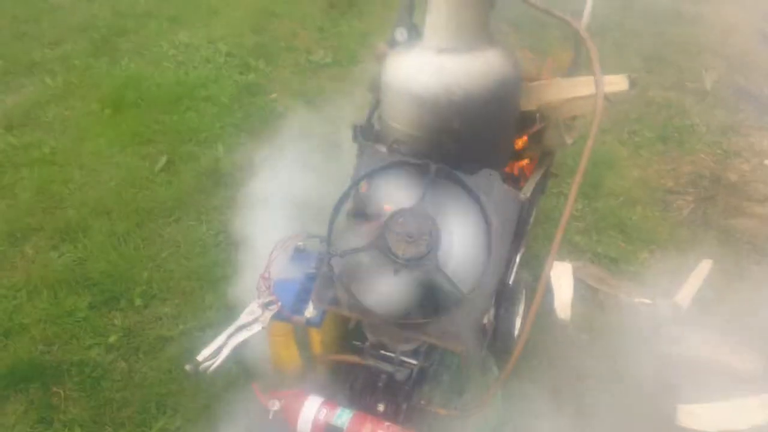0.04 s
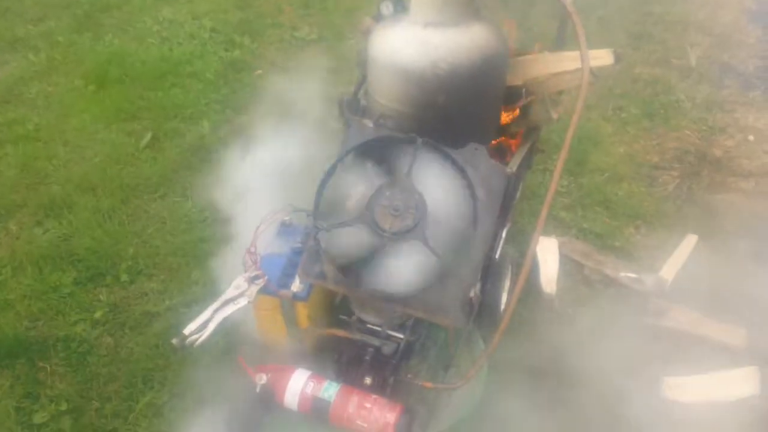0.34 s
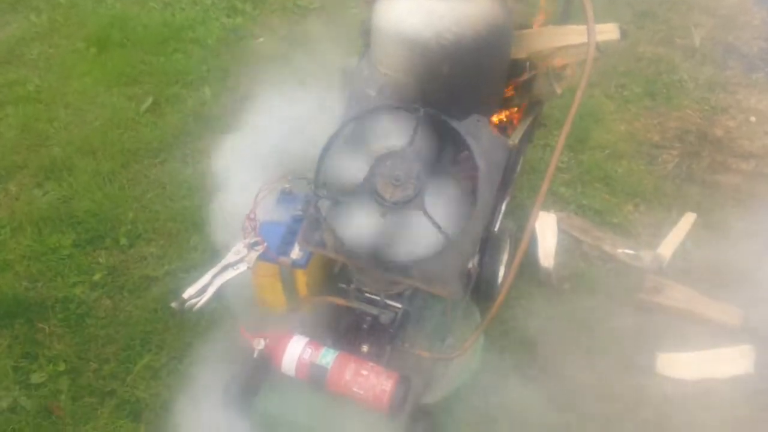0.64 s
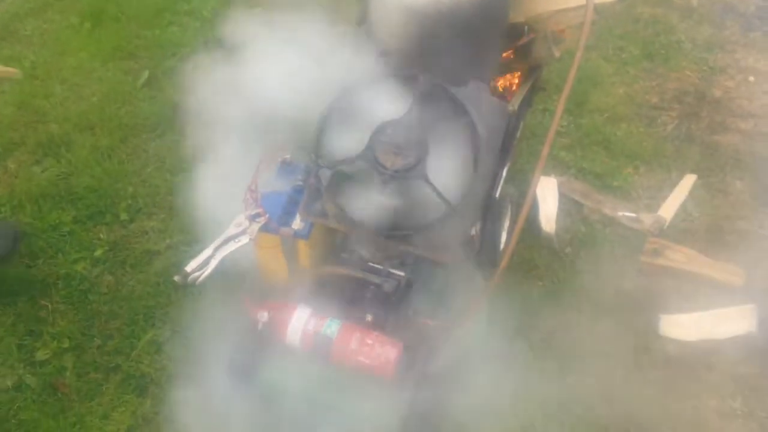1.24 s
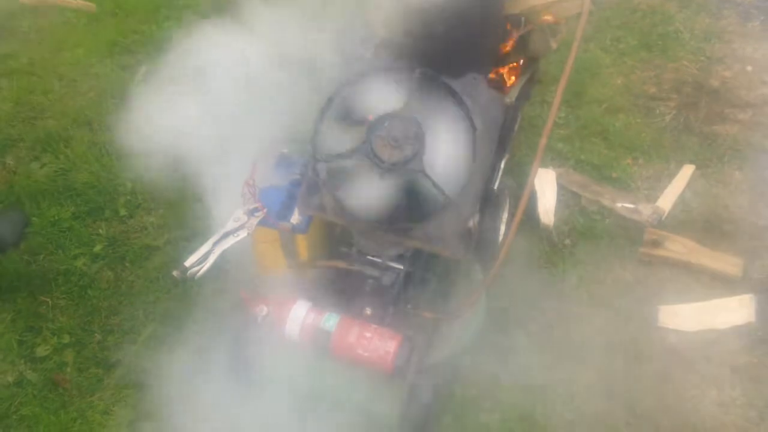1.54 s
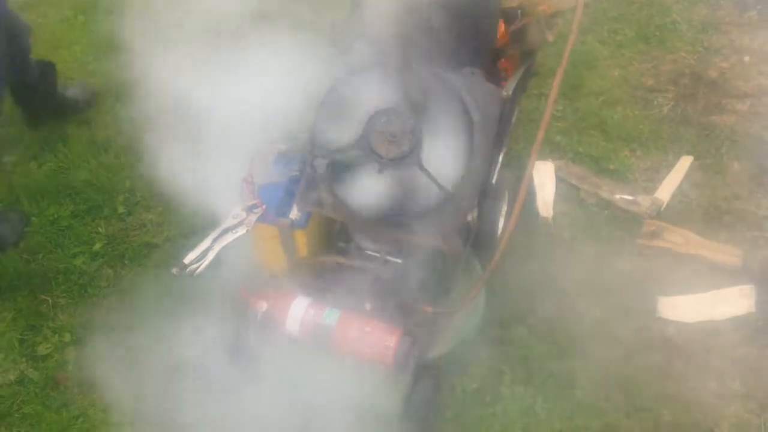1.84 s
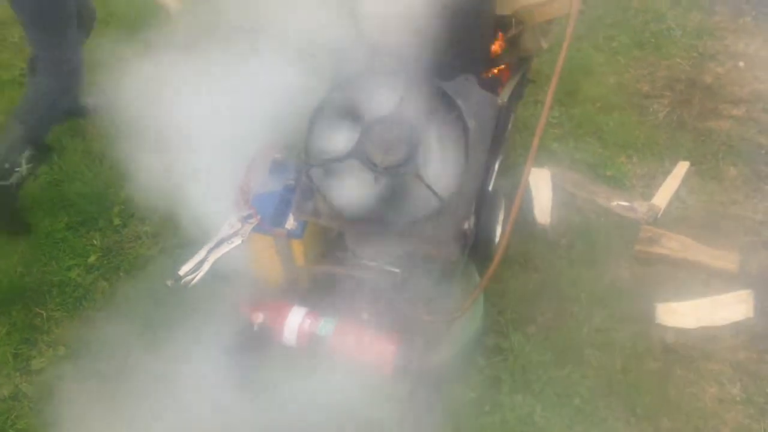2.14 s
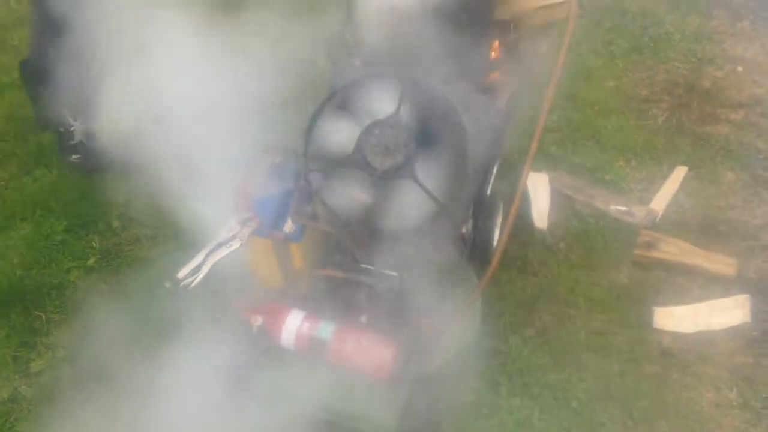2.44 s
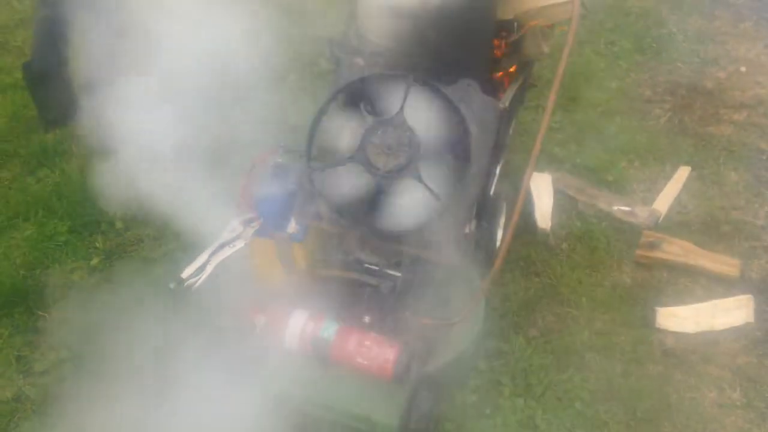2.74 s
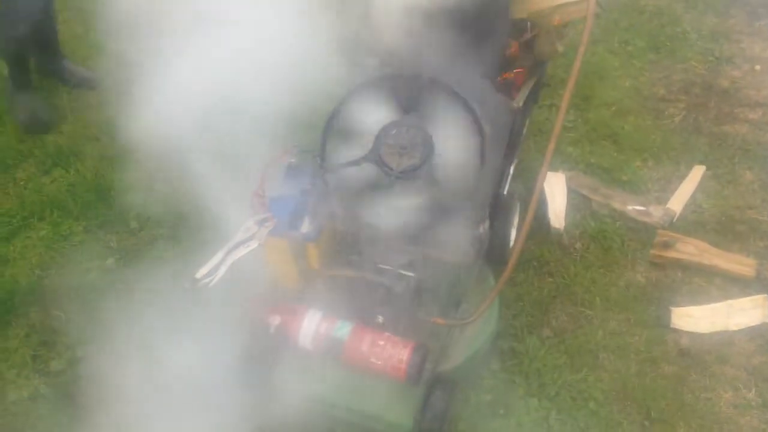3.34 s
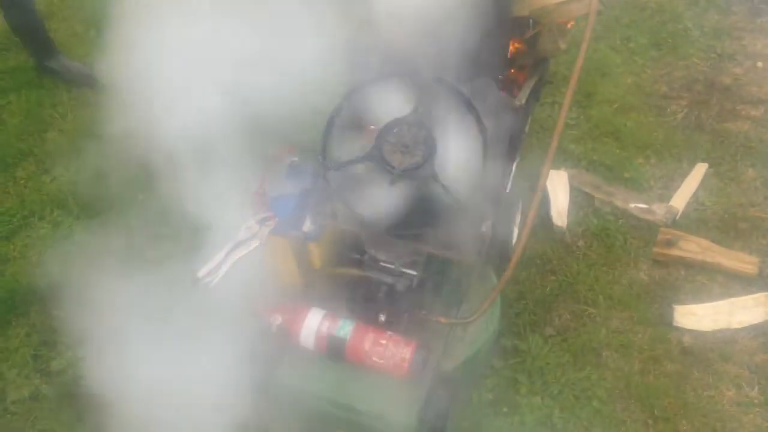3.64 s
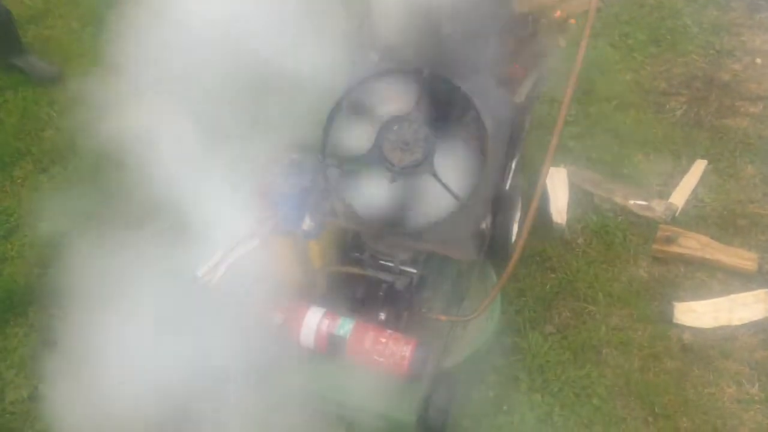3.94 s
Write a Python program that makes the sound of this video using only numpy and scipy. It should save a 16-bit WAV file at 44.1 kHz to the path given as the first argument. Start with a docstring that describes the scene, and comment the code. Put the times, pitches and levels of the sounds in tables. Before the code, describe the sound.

Close up outdoors, a small steam engine runs steadily in rapid thumping bursts of steam, with a sharp metallic knock on every second beat. Light wind brushes the microphone at first, and leaking steam rushes softly underneath.

```python
"""On a lawn, close by, a small homemade steam engine runs at about eleven strokes a second. Each stroke opens
the exhaust: a pressure pulse thumps and a turbulent jet of steam rushes and fades. The frame rings in its
modes, and each stroke ends in an impact, a metal clack with a dull thud, loud and weak on alternate strokes.
Boiler and leaks rush behind; a gust brushes the microphone at first."""
import sys
import numpy as np
from scipy import signal
from scipy.fft import rfft, irfft, next_fast_len
from scipy.io import wavfile
from scipy.ndimage import uniform_filter1d

SR = 44100
rng = np.random.default_rng(int(sys.argv[2]) if len(sys.argv) > 2 else 0)


def wav_record(signal):
    """Record a signal, one row per channel, as 16-bit PCM in the file named by sys.argv[1]."""
    frames = np.transpose(np.atleast_2d(signal))
    bounded = np.clip(frames, -1, 1)
    # unit amplitude maps onto the largest positive 16-bit level
    quanta = np.round(bounded * 32767).astype(np.int16)
    wavfile.write(sys.argv[1], SR, quanta)


N = 176400
IMPACT_SAMPLES = SR // 200  # a 0 dB impact has the energy of 5 ms at rms 1


def amp(db):
    """Amplitude ratio of a level in decibels."""
    return 10 ** (np.asarray(db) / 20)


def shape(points, hz):
    """Gain interpolated between (f/Hz, level/dB) points on a logarithmic frequency axis."""
    f, db = np.transpose(points)
    return amp(np.interp(np.log(hz + 1), np.log(f + 1), db))


def filtered(x, response):
    """Linear filtering: the spectrum is multiplied by a frequency response."""
    size = next_fast_len(N + SR // 2)
    return irfft(rfft(x, size) * response(np.fft.rfftfreq(size, 1 / SR)), size)[:N]


def noise(response):
    """Filtered Gaussian noise of rms 1."""
    x = filtered(rng.standard_normal(N), response)
    return x / np.sqrt(np.mean(x ** 2) + 1e-20)


def add(track, start_s, sound):
    """Superposition: a sound adds to the track from its start time."""
    i = int(round(start_s * SR))
    part = sound[max(-i, 0):max(N - i, 0)]
    track[max(i, 0):][:len(part)] += part


def pulse(points, size=4096):
    """Minimum-phase 0 dB impact with a given spectrum, made by folding the cepstrum."""
    cepstrum = irfft(np.log(shape(points, np.fft.rfftfreq(size, 1 / SR))))
    cepstrum[1:size // 2] *= 2
    cepstrum[size // 2 + 1:] = 0
    wave = irfft(np.exp(rfft(cepstrum)))
    return wave / np.linalg.norm(wave) * np.sqrt(IMPACT_SAMPLES)


# Noise spectrum of boiler and leaks: f/Hz, level/dB
BOILER_SPECTRUM = [(25, -59), (60, -30), (170, -9), (330, 0), (560, -3.5), (760, 2), (1300, -5),
                   (2200, -13), (4000, -18), (7500, -15.5), (11000, -17.5), (15000, -21.5)]


def boiler(rush_db=-34, hum_db=-39.5, hum_hz=167, hum_width_hz=9):
    """Stationary noise: boiler and leaks rush over a broad band, and a narrow band hums faintly."""
    rush = amp(rush_db) * noise(lambda f: shape(BOILER_SPECTRUM, f))
    hum = amp(hum_db) * noise(lambda f: np.exp(-((f - hum_hz) / hum_width_hz) ** 2))
    return rush + hum


# Envelope of the gust: t/s, level/dB
GUST_ENVELOPE = [(0, -31), (.06, -33), (.12, -29), (.2, -30), (.3, -28.5), (.38, -57), (.46, -60)]
# Spectrum of the wind noise: f/Hz, level/dB
WIND_SPECTRUM = [(20, -6), (60, -1), (120, -3.5), (220, -12), (400, -11.5), (1500, -77)]


def gust():
    """Turbulence at the microphone makes low-frequency pressure fluctuations."""
    level_db = np.interp(np.arange(N) / SR, *np.transpose(GUST_ENVELOPE))
    return amp(level_db) * noise(lambda f: shape(WIND_SPECTRUM, f))


def yard_scatter(x, t60_s=0.17, level_db=-18.5):
    """Diffuse scattering from things nearby: convolution with exponentially decaying noise."""
    t = np.arange(SR // 3) / SR
    tail = rng.standard_normal(len(t)) * amp(-60 * t / t60_s)
    return amp(level_db) * signal.fftconvolve(x, tail / np.linalg.norm(tail))[:N]


# Piston strokes, out and back in turn, driving all the engine's parts:
# t/s, thump level/dB, steam level/dB, knock level/dB
PISTON_STROKES = [(0.0, -2.5, -0.2, -3.3), (0.0909, 2, 0.2, -13.9), (0.178, 2.3, 0.5, -1.5),
                  (0.2694, 3, 0.3, -15), (0.356, 3.1, -2.5, -5.5), (0.4498, 1.5, 0.9, -17),
                  (0.5381, 1.5, 0.5, -2.8), (0.6306, 2, 1, -16), (0.7192, 3, 0.5, -1.5),
                  (0.812, 2.9, 0.2, -14.6), (0.9005, 1.8, 0.8, -2.3), (0.992, 1.8, 0.7, -16),
                  (1.0813, 1.5, 0.5, -3.5), (1.174, 1, 0.5, -16), (1.2626, 1.7, -0.5, -3.3),
                  (1.3555, 1.5, 0.8, -14.5), (1.4215, -11, 0, -1.5), (1.5125, 2.7, 1.2, -13),
                  (1.6008, 2.5, 1, -3), (1.6942, 1.5, 1, -17), (1.7822, 1.5, 0.4, -4.3),
                  (1.8759, 1.5, 1.3, -17), (1.9639, 1, -0.3, -2.5), (2.0562, 2.5, 1, -12),
                  (2.1442, 1.5, 0.1, -2.5), (2.2368, 1.5, 0.4, -15), (2.3249, 1.5, 0, -2.5),
                  (2.417, 1.8, 0.7, -13.1), (2.505, 1.5, 0, -2.7), (2.5978, 1.2, 0.7, -11.4),
                  (2.6856, 2.5, 0.1, -2.7), (2.7778, 0.6, 0.6, -14), (2.8657, 1.9, 0.5, -2.2),
                  (2.9579, 1, 0.3, -12.5), (3.0461, 1.7, 0.0, -0.7), (3.1385, 2, 0.5, -17),
                  (3.226, 1.5, 0.5, -0.1), (3.3194, 1.5, 0.5, -13), (3.4079, 2.5, -0.5, 0),
                  (3.5009, 1.5, 0.5, -13), (3.5888, 1.5, -0.4, -1.5), (3.6815, 0.7, 0.3, -14),
                  (3.77, 1, 0.1, -1.5), (3.863, 2, 1, -10.9), (3.9518, 1.5, -0.1, -1.3)]
# Modes of the frame: f/Hz, level/dB, T60/s
FRAME_MODES = [(165, -38, 0.15), (311, -36, 0.28), (388.6, -38.5, 0.46), (479.5, -44, 0.53),
               (719, -33.5, 0.18), (855, -41.5, 0.68), (1020, -26, 0.085), (2028, -37, 0.15),
               (3960, -55, .12), (10400, -53, .2)]


def frame_ring(rise_s=0.0068):
    """Damped free vibration: each stroke excites the frame's modes; mid-stroke the frame shudders."""
    shudder_s = (0.026, 0.0208)  # out, back
    shudder_hz, shudder_width_s, shudder_db = 328.6, 0.0038, -20
    out, t = np.zeros(N), np.arange(SR // 3) / SR
    for k, (start, *_) in enumerate(PISTON_STROKES):
        draws = rng.standard_normal((len(FRAME_MODES), 2))
        ring = sum(amp(db + 2 * spread - 60 * t / t60) * np.sin(2 * np.pi * hz * t + np.pi * phase)
                   for (hz, db, t60), (spread, phase) in zip(FRAME_MODES, draws))
        lag = t - shudder_s[k % 2]
        envelope = amp(shudder_db + rng.normal()) * np.exp(-(lag / shudder_width_s) ** 2)
        shudder = envelope * np.cos(2 * np.pi * shudder_hz * lag)
        add(out, start, ring * np.minimum(t / rise_s, 1) + shudder)
    return out


# Spectrum of the piston's thud: f/Hz, level/dB
THUD_SPECTRUM = [(25, -29), (100, -9.5), (200, -4), (280, -0.5), (370, -9), (480, -33.5), (790, -8),
                 (1300, -30.5), (2500, -44), (6000, -52)]


def piston_thuds(delay_s=0.0438, level_db=-17, knock_share=0.37):
    """Impact at the end of the stroke: a low-frequency pulse whose level follows that of the knock."""
    out, thud = np.zeros(N), pulse(THUD_SPECTRUM)
    for start, _, _, knock_db in PISTON_STROKES:
        add(out, start + delay_s, amp(level_db + knock_share * knock_db) * thud)
    return out


# Resonances of the linkage: f/Hz, bandwidth/Hz, level/dB
LINKAGE_MODES = [(730, 120, -1), (1350, 193, 2), (1770, 220, -5.5), (2490, 180, 1), (2970, 670, -8.5),
                 (3690, 220, -6), (4280, 120, -4.5), (5120, 170, -5), (6400, 510, -9), (6000, 380, -17),
                 (7270, 150, -7.5), (8150, 390, -2), (10500, 1200, -21)]
# Non-resonant part of the clack, on the same scale: f/Hz, level/dB
CLACK_SPECTRUM = [(200, -39), (600, -31), (1000, -11), (2600, -11), (3400, -22.5), (5000, -5.5),
                  (8200, -20.5), (10000, -64), (15000, -28)]


def linkage_knocks(delay_s=0.0426, level_db=-15, rise_s=0.0012, fall_s=0.0026, size=4096):
    """Impact excitation: as slack is taken up, a chatter of contacts drives the linkage's resonances."""
    tick_lead_s, tick_db = (0.003, 0.0059), -22  # a light tick precedes each stroke: out, back
    out, t = np.zeros(N), (np.arange(size) - size // 4) / SR
    f = np.fft.rfftfreq(size, 1 / SR)
    burst = np.exp(np.minimum(t / rise_s, -t / fall_s))
    metal = sum((-1) ** k * amp(db) * 1j * f * width / (hz * hz - f * f + 1j * f * width)
                for k, (hz, width, db) in enumerate(LINKAGE_MODES))
    for k, (start, thump_db, _, knock_db) in enumerate(PISTON_STROKES):
        tick = (start - tick_lead_s[k % 2], tick_db + thump_db)
        knock = (start + delay_s, knock_db)
        for when, db in tick, knock:
            chatter = rfft(burst * rng.standard_normal((2, size)))
            # whitening gives every random chatter the same colour
            chatter /= np.sqrt(uniform_filter1d(abs(chatter) ** 2, size=30, axis=1))
            clack = irfft(chatter[0] * metal + chatter[1] * shape(CLACK_SPECTRUM, f))
            clack *= np.sqrt(IMPACT_SAMPLES) / np.linalg.norm(clack)
            add(out, when + t[0], amp(level_db + db) * clack)
    return out


# Resonances and antiresonances of the exhaust: f/Hz, half-width/Hz, level/dB
PORT_RESONANCES = [(1383, 260, 5), (2007, 57, 4.5), (2226, 124, 3), (3250, 153, -7), (3980, 81, 2.5),
                   (4280, 50, 3.5), (5150, 125, -5), (5620, 55, -2), (6040, 106, 5), (6300, 34, -16),
                   (7260, 230, 2), (8420, 170, -10.5), (9570, 34, -6), (10900, 80, 4.5)]


def exhaust_port(f):
    """Frequency response of the exhaust: resonances add peaks and antiresonances cut hollows."""
    return amp(sum(db * np.exp(-((f - hz) / width) ** 2) for hz, width, db in PORT_RESONANCES))


# Spectrum of the steam jet: f/Hz, level/dB
JET_SPECTRUM = [(40, -12), (150, 0), (310, -2.5), (520, -5.5), (800, 2.5), (1400, -3), (2600, -2),
                (4500, -1.5), (7300, 1), (10300, -1), (12000, -8.5), (15200, -5)]
# Spectrum of the spurt as the valve cracks open: f/Hz, level/dB
SPURT_SPECTRUM = [(500, -4), (2000, -7), (5000, -19), (8500, 14), (11000, -5), (15000, 4)]


def steam_jet():
    """Turbulent jet noise: a bright spurt, then a rush that fades as the cylinder empties."""
    lead_s, open_s = 0.0025, 0.0068  # the valve starts to open just ahead of the stroke
    close_s, close_db_per_s = (0.046, 0.033), 800  # out, back
    jet_db, surge_db, surge_s, fade_db_per_s = -15, 5, 0.0041, 237
    spurt_db, spurt_s, spurt_width_s = -16.5, 0.0022, 0.0067
    skip_s, skip_gap_s, skip_burst_db, skip_decay_s = 1.4228, 0.008, -14, 0.002
    sputter_db, sputter_hz = 0.06, 700  # very slight flutter of the wet steam
    flow, spurts, t = np.zeros(N), np.zeros(N), np.arange(SR // 10) / SR
    opening = np.minimum(t / open_s, 1)
    fade_db = surge_db * np.exp(-(t / surge_s) ** 2) - fade_db_per_s * t
    spurt = np.exp(-((t - lead_s - spurt_s) / spurt_width_s) ** 2)
    for k, (start, _, steam_db, _) in enumerate(PISTON_STROKES):
        closing_db = close_db_per_s * np.maximum(t - close_s[k % 2], 0)
        add(flow, start - lead_s, opening * amp(jet_db + steam_db + fade_db - closing_db))
        add(spurts, start - lead_s, opening * amp(spurt_db + steam_db) * spurt)
    # the sound skips once, like a cut: the beat jumps ahead and the hiss starts abruptly
    gap = slice(int((skip_s - skip_gap_s) * SR), int(skip_s * SR))
    flow[gap] = spurts[gap] = 0
    add(spurts, skip_s, amp(skip_burst_db) * np.exp(-t / skip_decay_s))
    sputter = amp(sputter_db * noise(lambda f: np.exp(-(f / sputter_hz) ** 2)))
    rush = flow * noise(lambda f: shape(JET_SPECTRUM, f) * exhaust_port(f))
    hiss = spurts * noise(lambda f: shape(SPURT_SPECTRUM, f) * exhaust_port(f))
    return sputter * (rush + hiss)


def exhaust_thumps():
    """Pressure transient: a brief rarefaction, a spike as the exhaust opens, an air-column rebound."""
    dip_lead_s, dip_width_s, dip_db = 0.0016, 0.001, -23.5
    rise_s, fall_s, spike_db = 0.0002, 0.0005, -3.5
    rebound_s, rebound_hz, rebound_t60_s, rebound_db = 0.0012, 292, 0.016, -8.5
    out, t = np.zeros(N), np.arange(-SR // 100, SR // 20) / SR
    dip = amp(dip_db) * np.exp(-((t + dip_lead_s) / dip_width_s) ** 2)
    spike = amp(spike_db) * np.exp(np.minimum(t / rise_s, -t / fall_s))
    age = np.maximum(t - rebound_s, 0)
    rebound = amp(rebound_db - 60 * age / rebound_t60_s) * np.sin(2 * np.pi * rebound_hz * age)
    for start, thump_db, _, _ in PISTON_STROKES:
        add(out, start + t[0], amp(thump_db) * (spike - dip - rebound))
    return out


def scene():
    """Superposition in the open air: background, scattered sound and the engine's direct sound."""
    engine = frame_ring() + piston_thuds() + linkage_knocks() + steam_jet() + exhaust_thumps()
    return (boiler() + gust() + yard_scatter(engine) + engine)[None]


def record(dry):
    """Microphone response: a high-pass, soft saturation of peaks, a treble notch and a band limit."""
    low_cut_hz, ceiling, top_hz = 82, 0.95, 15400
    notch_hz, notch_width_hz, notch_depth = 12540, 940, 0.77
    sound = signal.sosfilt(signal.butter(2, low_cut_hz, "high", fs=SR, output="sos"), dry[0])
    sound = sound / (1 + np.abs(sound / ceiling) ** 8) ** (1 / 8)
    notch = lambda f: 1 - notch_depth * np.exp(-((f - notch_hz) / notch_width_hz) ** 2)
    return filtered(sound, lambda f: notch(f) / np.sqrt(1 + (f / top_hz) ** 200))[None]


dry = scene()
out = record(dry)
wav_record(out)
```